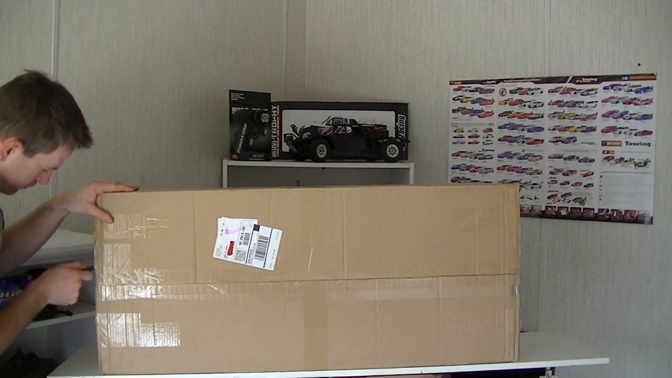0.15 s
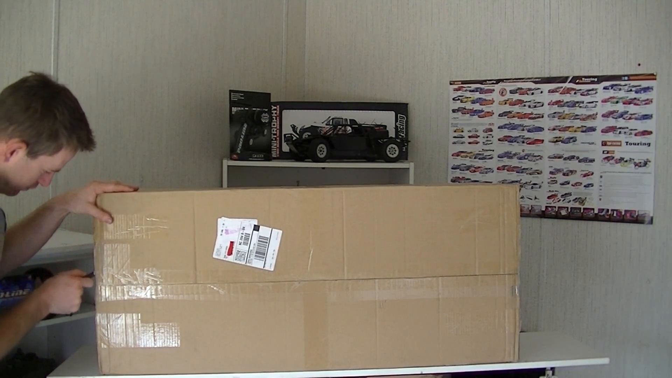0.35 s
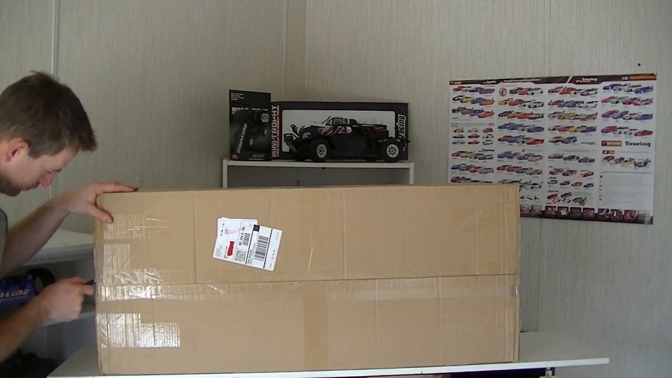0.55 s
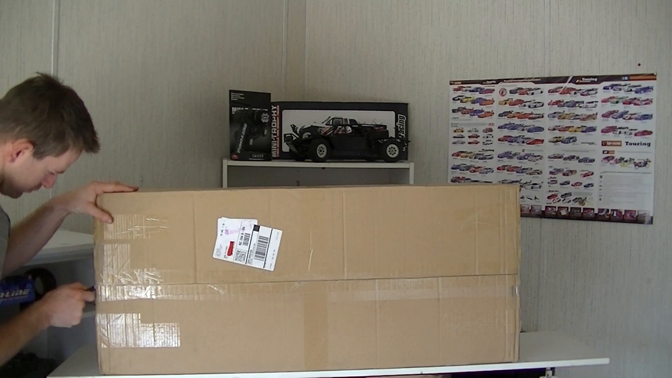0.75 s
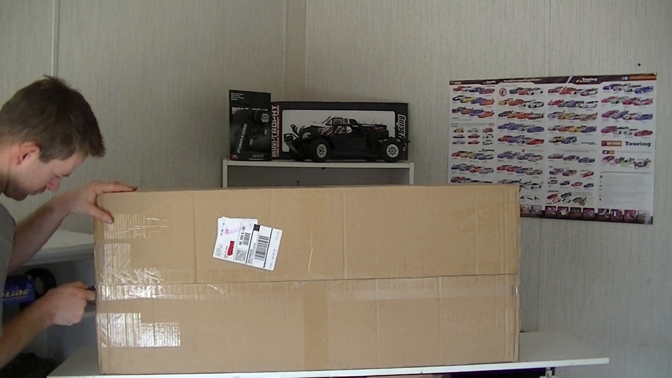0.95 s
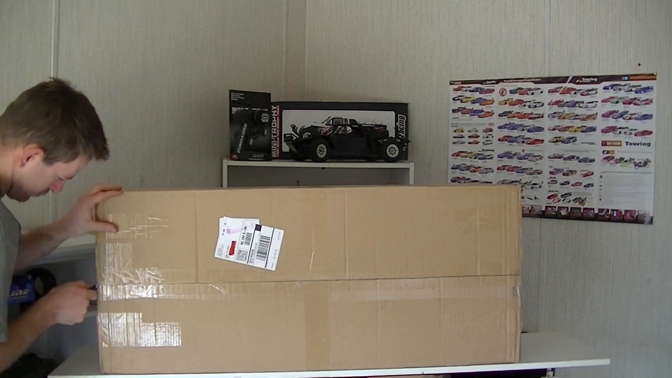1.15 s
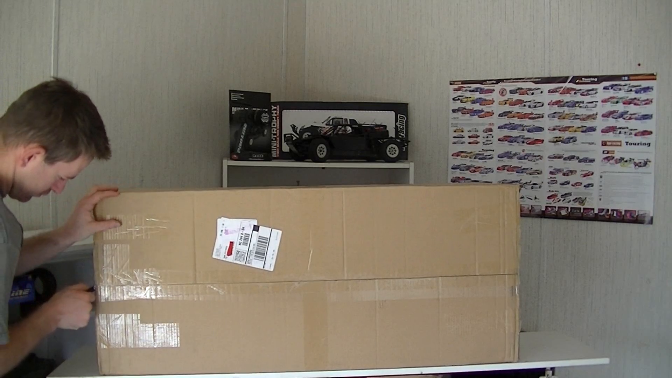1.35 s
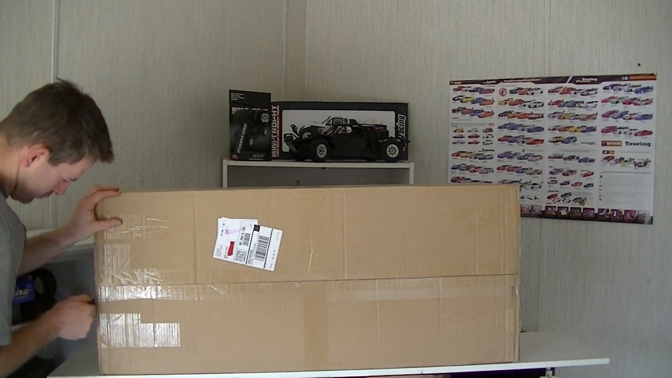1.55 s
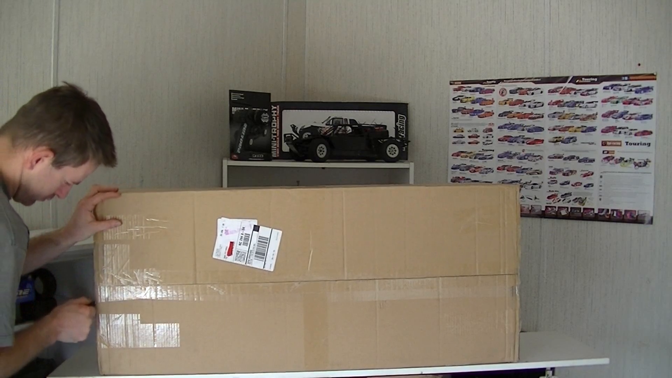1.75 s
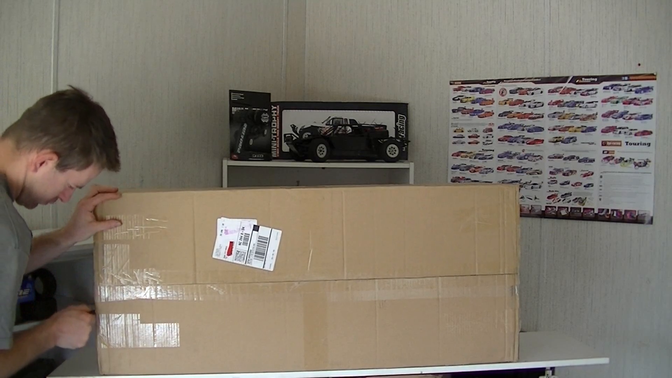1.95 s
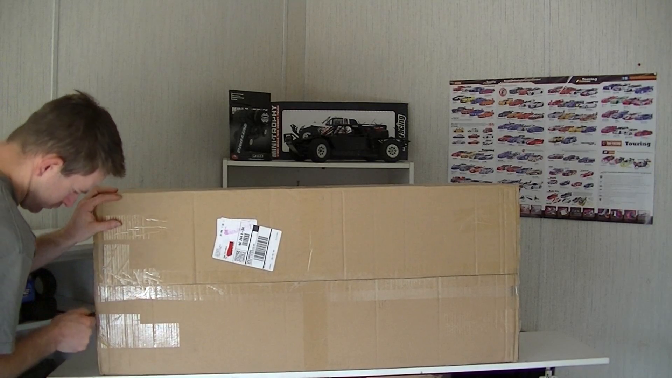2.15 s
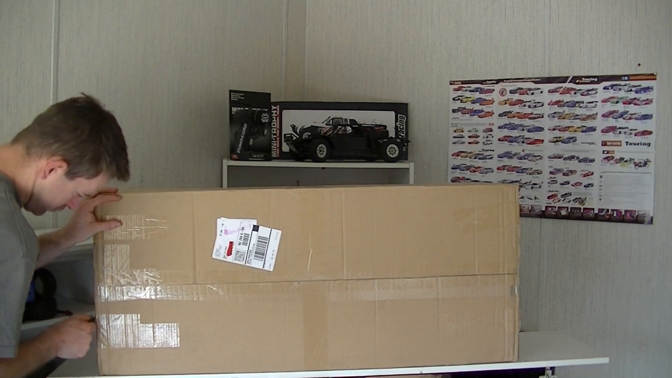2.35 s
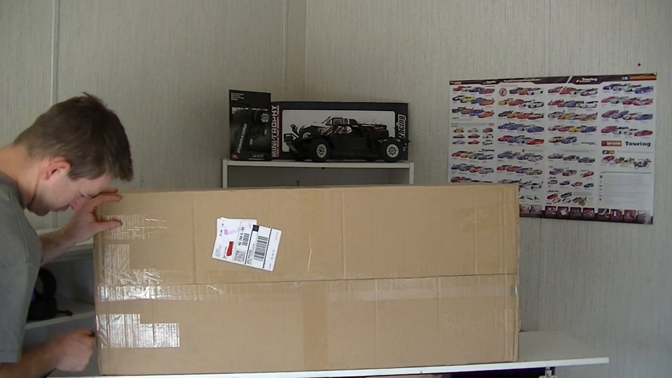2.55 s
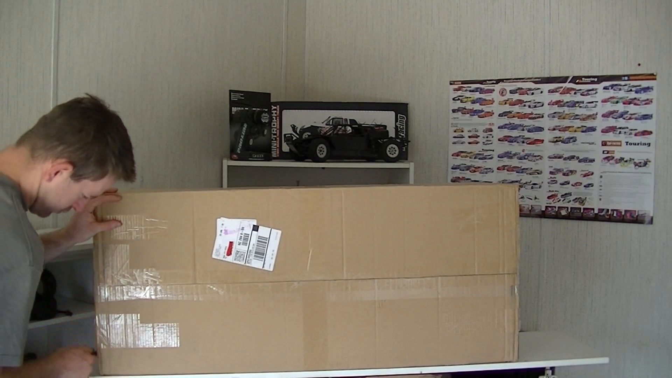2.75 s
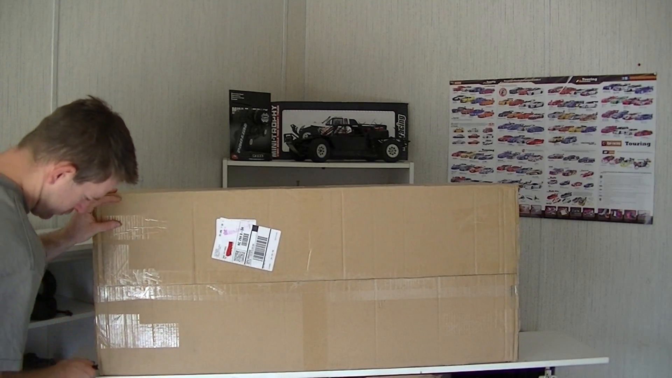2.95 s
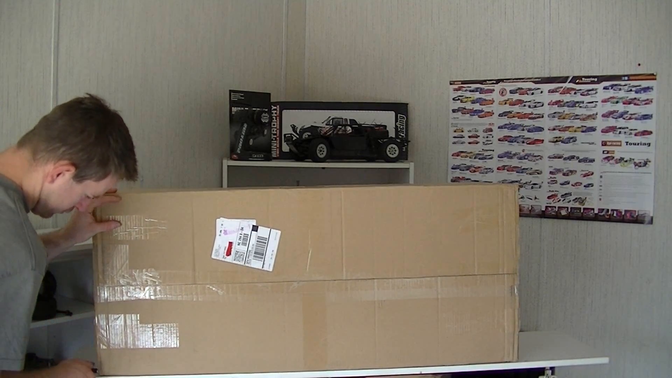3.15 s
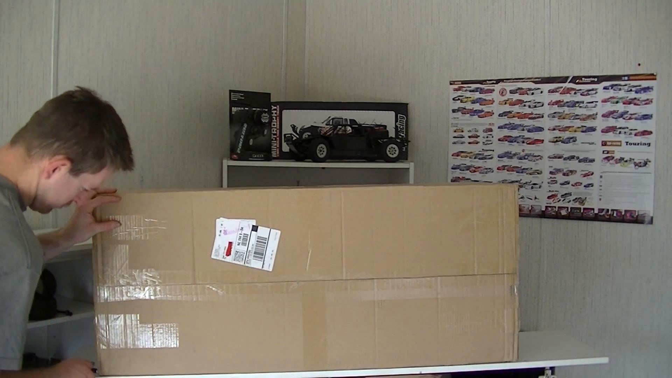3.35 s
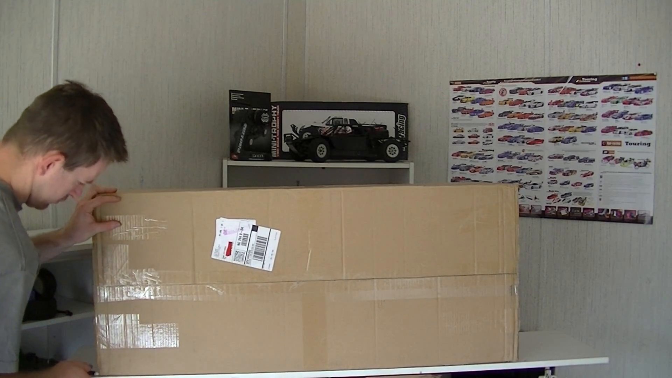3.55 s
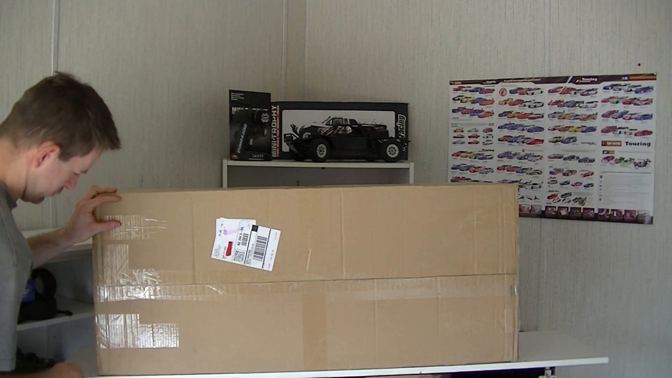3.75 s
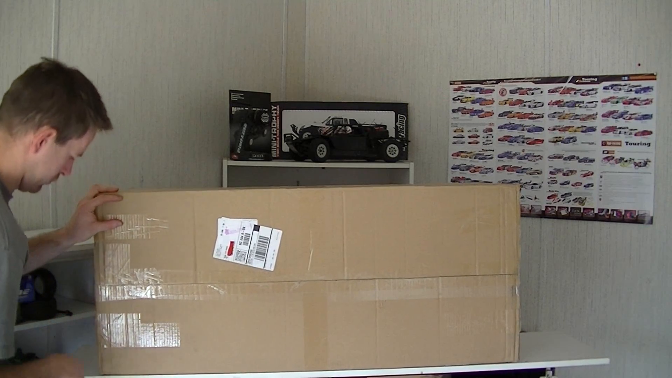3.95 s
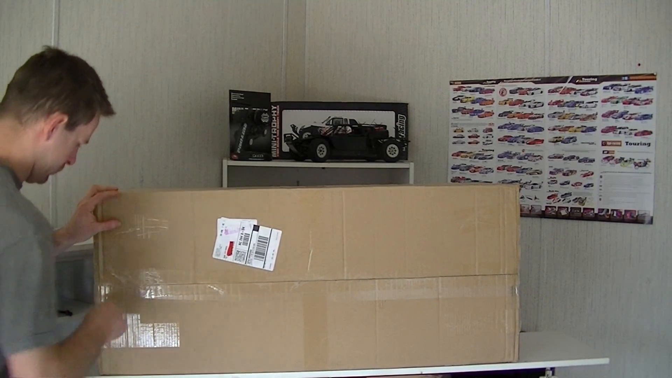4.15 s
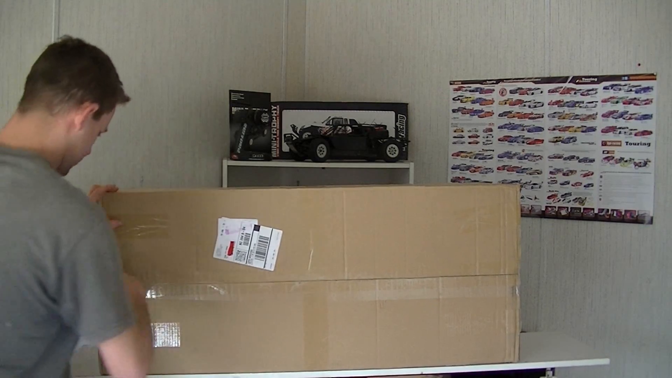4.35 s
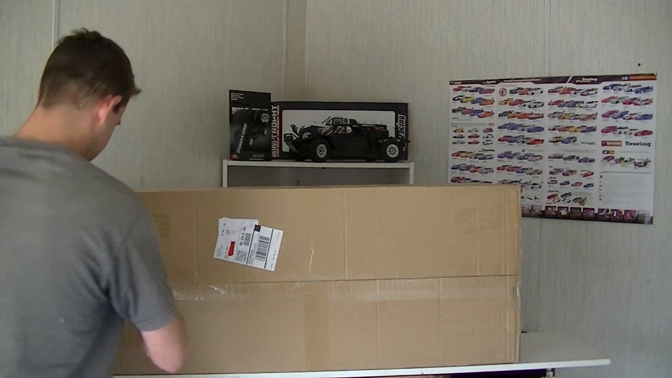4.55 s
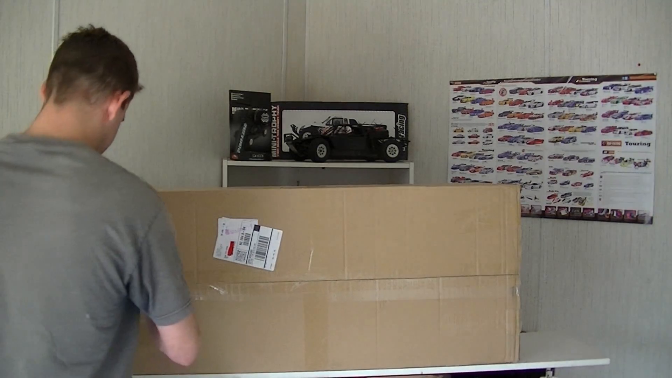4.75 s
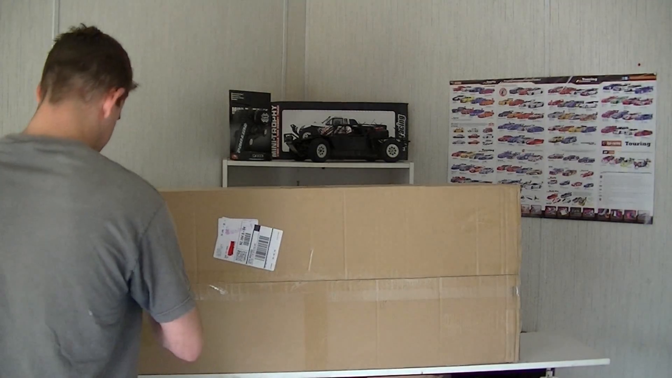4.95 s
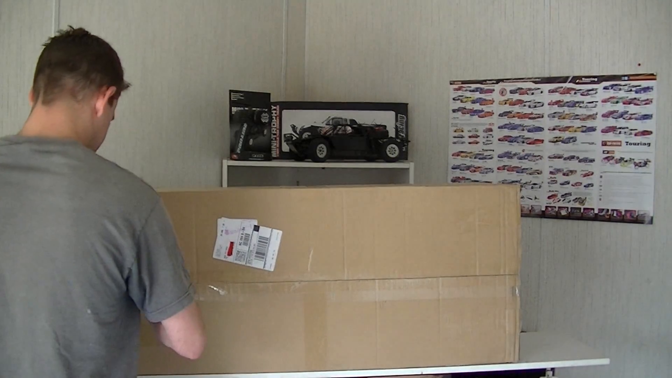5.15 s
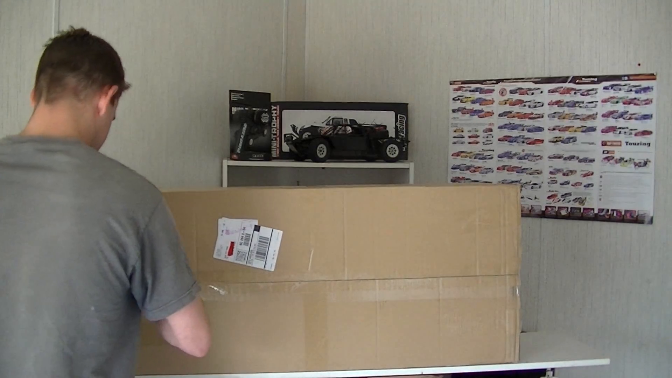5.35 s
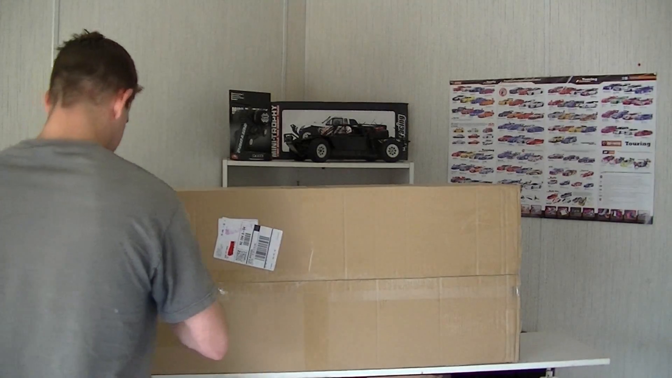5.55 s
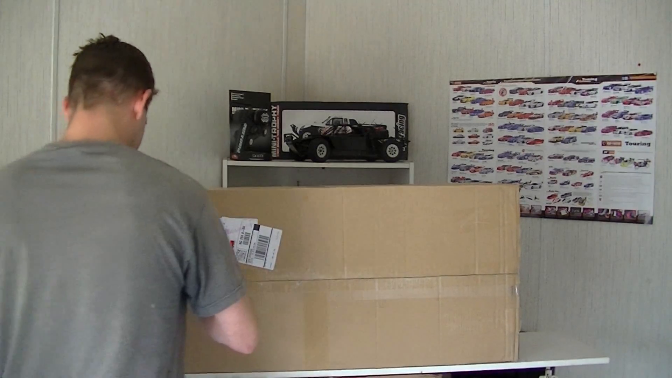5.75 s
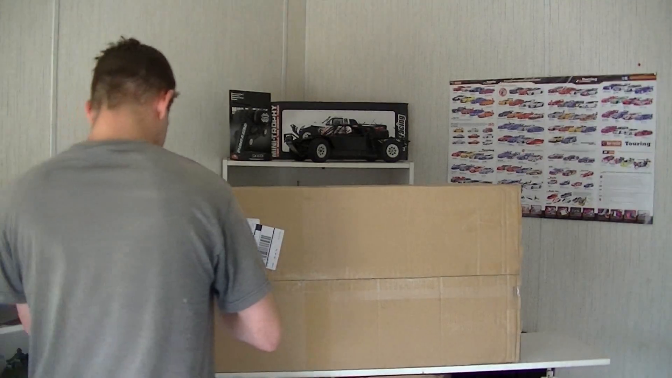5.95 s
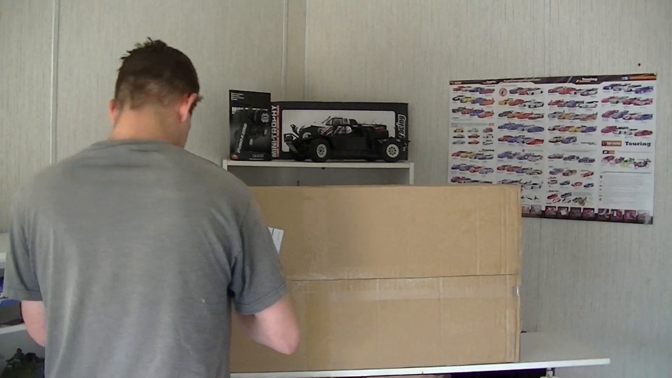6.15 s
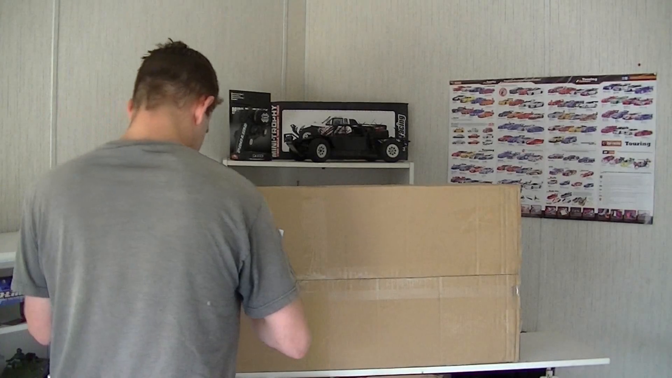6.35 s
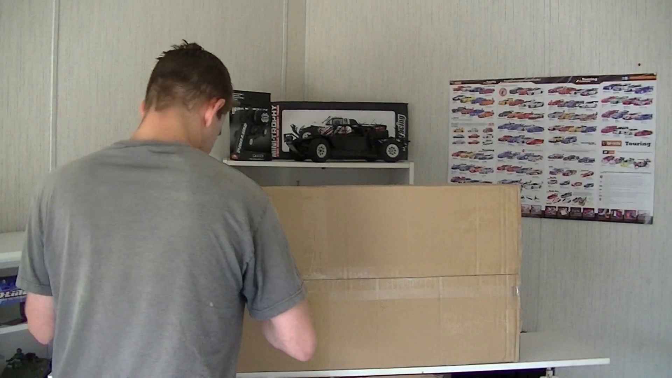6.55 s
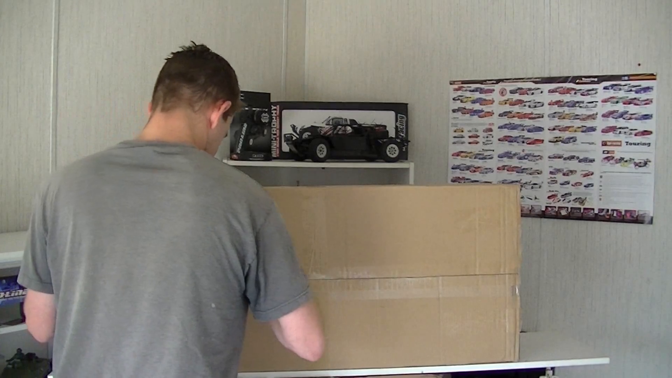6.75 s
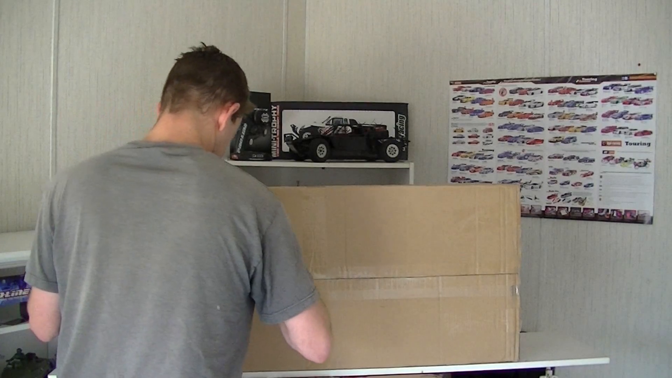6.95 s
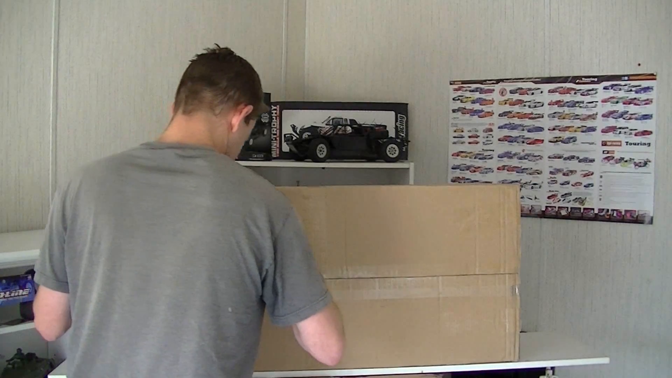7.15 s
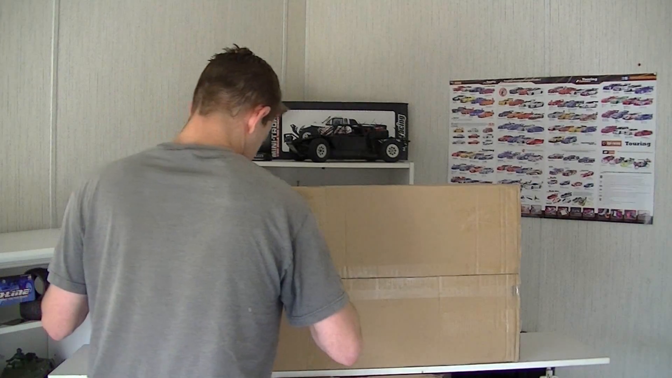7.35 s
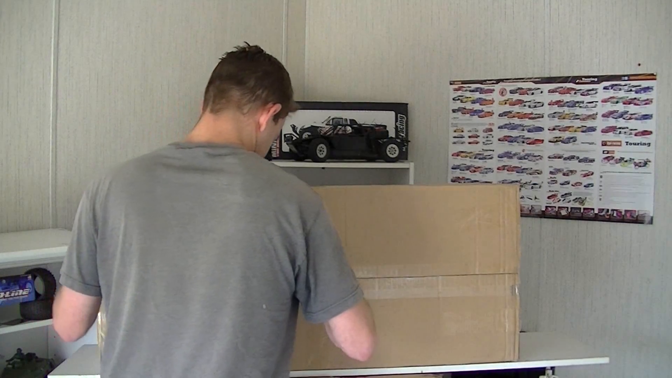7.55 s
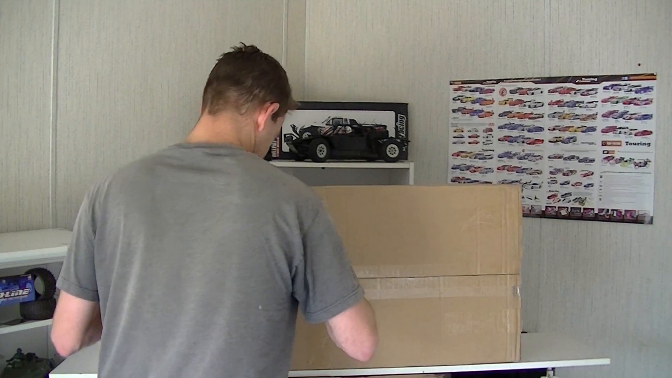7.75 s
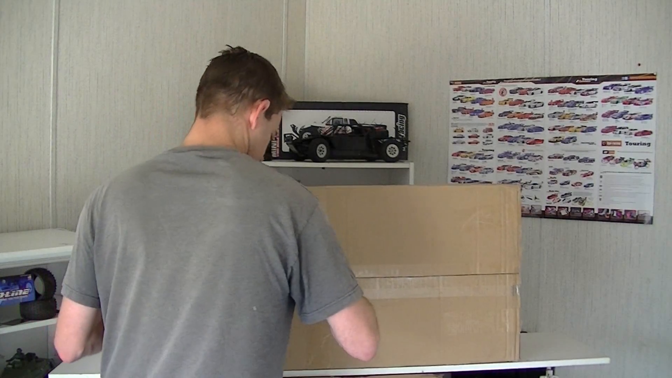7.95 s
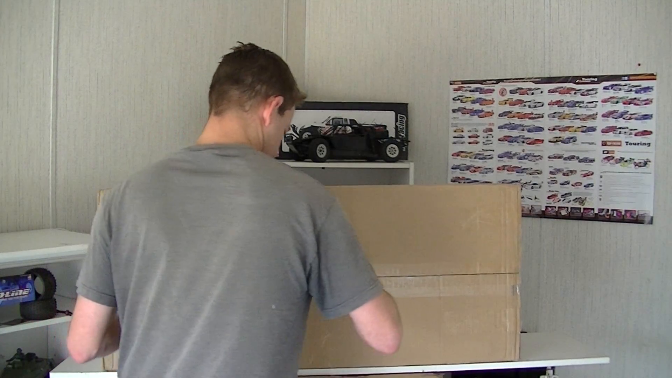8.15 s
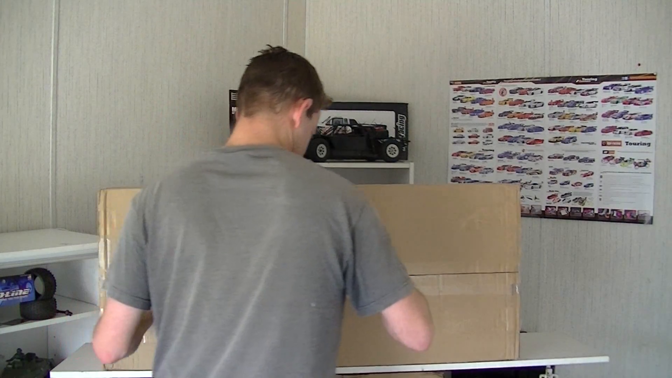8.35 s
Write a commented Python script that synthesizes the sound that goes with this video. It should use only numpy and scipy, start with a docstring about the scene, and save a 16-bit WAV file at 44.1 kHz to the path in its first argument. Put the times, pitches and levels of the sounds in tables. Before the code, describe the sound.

In a small room, a blade scratches through tape and cardboard in short uneven strokes. Light rasps and small ticks come first, then a sharp snap and a hollow knock. After a quiet lull, a loud crack starts heavier, nearly continuous sawing with knocks and brief panel booms. The microphone is a little distant, nearly mono, thin in the bass, with steady soft hiss.

```python
"""In a small room a blade is sawn through the tape and cardboard of a large box.
Tearing fibres, random clicks of uneven strength, scrape in a band that moves with the stroke and
rub the board; finer ones fizz above, coarser jolts drum the hollow box. Snaps of tape and knocks
are noise bursts that ring the modes of the box; one squeak, panel booms and low thuds join them.
Sparse echoes carry all but the thuds through the room, over the steady hiss of the camera."""
import sys
import numpy as np
from scipy import signal
from scipy.fft import rfft, irfft
from scipy.io import wavfile
from scipy.ndimage import uniform_filter1d

SR = 44100
rng = np.random.default_rng(int(sys.argv[2]) if len(sys.argv) > 2 else 0)


def int16_out(signal):
    """Quantize to a 16-bit WAV file."""
    q = np.round(np.clip(np.atleast_2d(signal).T, -1, 1) * 32767)
    wavfile.write(sys.argv[1], SR, q.astype(np.int16))


N = 373968  # length in samples


def gain_of(db):
    """Decibels to an amplitude factor."""
    return 10 ** (np.asarray(db) / 20)


def evened(x):
    """Scales to rms 1."""
    return x / np.sqrt(np.mean(x ** 2) + 1e-20)


def read(points, hz):
    """Reads a table on a log-frequency axis."""
    f, value = np.transpose(points)
    return np.interp(np.log(hz + 1), np.log(f + 1), value)


def add(mix, s, sound):
    """Mixes a sound in at time s."""
    part = mix[round(s * SR):][:len(sound)]
    part += sound[:len(part)]


def coloured(x, points):
    """Causal filter with the given spectrum, unit energy: the phase follows from the log gain."""
    hz = abs(np.fft.fftfreq(8192, 1 / SR))
    log_gain = np.log(gain_of(np.maximum(read(points, hz), -100)))
    taps = np.fft.ifft(np.exp(np.conj(signal.hilbert(log_gain)))).real[:4096]
    return signal.oaconvolve(x, taps / np.linalg.norm(taps))[:len(x)]


# Pushes of the blade and rubs of a hand. Each row: start, rise, hold and fall in seconds,
# scrape level in dB before the mix, centre of the scrape in Hz,
# then hollow drumming, rubbed board and fizz in dB relative to the scrape.
STROKES = [ (0, 0.00079, 0.056, 0.21, -38, 2020, -14.5, -10.5, -2.5),
           (.215, 0.019, .26, .08, -44.5, 1700, -29, -6.5, -1),
           (.54, 0.045, 0.019, 0.25, -38, 2090, -31, -10, -1.5),
           (0.861, 0.089, 0.14, 0.24, -43.5, 1660, -19, -3.5, 3),
           (1.24, .04, 0.012, 0.13, -50.5, 1692, -14, -7.5, -2),
           (1.362, 0.049, 0.073, .11, -33.5, 2030, -40, -12, -0.5),
           (1.4, 0.062, 0.047, 0.12, -28.5, 2180, -30, -11, -8),
           (1.57, .02, 0.017, 0.12, -46.5, 1800, -13, -1, -7),
           (1.705, 0.035, 0.026, .11, -36, 2040, -34, -8.5, -12.5),
           (1.732, 0.066, 0.041, 0.11, -30.5, 2100, -44, -6.5, -5.5),
           (2.11, 0.062, 0.048, 0.14, -36.5, 1880, -19, -4.5, -5.5),
           (2.387, 0.035, 0.075, 0.12, -41.5, 1910, -34, -0.5, -2),
           (2.42, .11, 0.061, 0.35, -34.5, 2010, -26, -10, 0),
           (2.64, 0.092, 0.086, 0.22, -28, 2420, -46, -26, -6),
           (2.929, 0.065, 0.082, .11, -36.5, 2347, -24, -5, -10),
           (3.15, .015, .02, 0.13, -53, 1490, -11, 3, -1), (3.2, .04, .03, .08, -54, 1600, -12, -2, 4),
           (3.29, 0.024, .01, 0.11, -56, 1300, -1, 8, -19), (3.49, 0.032, .02, 0.13, -41, 1610, -9, 2.5, 2),
           (3.6, 0.088, .03, .05, -37.5, 2020, -17, -6, -8),
           (3.693, .002, 0.023, 0.12, -25.5, 1700, -13, -7.5, -18),
           (3.86, 0.065, .01, 0.098, -52, 1630, -12, -1, -6),
           (4.06, 0.054, .01, .11, -58.5, 1550, -11, 3, 2),
           (4.15, 0.054, .17, .05, -60, 1770, -4, -8, -1.5),
           (4.401, 0.025, 0.14, 0.17, -50.5, 1830, -7, -3.5, -1.5),
           (4.55, 0.048, 0.014, 0.57, -48, 2640, -25, -12, -3),
           (4.76, 0.089, .01, 0.045, -54, 1690, .1, .1, -1),
           (4.867, .002, 0.017, 0.086, -41, 2030, 3, 1.5, -15),
           (5.05, 0.058, .01, 0.22, -57, 1950, -19, -4, -1),
           (5.164, 0.0016, 0.032, 0.12, -24.5, 1510, -25, -6.5, -2),
           (5.25, .04, .19, 0.06, -49, 1570, -29, -5, -1.5),
           (5.477, .025, 0.024, 0.2, -34, 2030, -9, -3.5, -3.5),
           (5.55, .005, .02, 0.22, -32, 1720, -17, -8, -5),
           (5.621, 0.0015, 0.044, 0.21, -28.5, 1600, -6, -4, -3),
           (5.72, 0.0088, .03, .11, -33, 1550, -8, -4, -6),
           (5.764, .002, 0.068, .19, -27.5, 1640, -4.5, -1.5, -3),
           (5.94, 0.033, .08, .05, -40, 1600, -15, -6, -1.2),
           (6.047, 0.0013, 0.054, 0.2, -31, 1800, -1, -1.7, -3),
           (6.099, 0.056, 0.066, 0.56, -32, 1990, -11, -4.5, -3),
           (6.268, 0.037, 0.013, 0.47, -35, 1640, -8.5, -7.5, 2.5),
           (6.38, 0.048, 0.016, 0.057, -40.5, 1600, -15, -12, 2.5),
           (6.5, .07, 0.02, 0.018, -45, 1410, -54, -10, -3.3),
           (6.596, 0.0038, 0.054, 0.12, -22, 1420, -9.5, -4.5, -8.5),
           (6.68, 0.034, 0.076, 0.22, -38, 1500, -11, -4.5, -4.5),
           (6.85, 0.1, 0.092, 0.33, -33.5, 1550, -14, -6.5, -6),
           (7.029, 0.081, 0.023, 0.16, -35.5, 1830, -7.5, -6.5, -0.5),
           (7.206, 0.0048, 0.097, .05, -38, 1536, -17.5, -4.5, -2.5),
           (7.288, 0.044, 0.031, 0.37, -25.5, 1530, -15, -4.5, -9.5),
           (7.5, .05, 0.099, 0.093, -49, 1730, -11, -20, 5.5),
           (7.598, 0.12, 0.0071, 0.21, -36.5, 1740, -37, -10, 2.5),
           (7.78, 0.06, .04, .05, -43, 1570, -3.5, -4, 0),
           (7.86, 0.0069, .03, 0.4, -34, 1680, -14, -3, -0.5),
           (7.921, 0.087, 0.0081, 0.083, -29, 1610, -9, -5, -6),
           (8.03, 0.016, 0.04, 0.31, -33.5, 1550, -11, -6, -5),
           (8.11, 0.019, 0.081, 0.36, -32.5, 1540, -14, -2, -5),
           (8.2, 0.062, .19, 0.24, -30.5, 1550, -10, -5, -6)]
# Stretch of the fall time. In order: scrape, hollow, board, fizz, as factors.
FALL_STRETCH = np.array([0.97, 0.89, 1.15, 0.8])
# Shift of the moment each layer starts to fall, board and fizz early, hollow last.
# In order: scrape, hollow, board, fizz, in seconds.
FALL_LAG_S = np.array([-0.002, 0.01, -0.0049, -0.0046])
BITE_DB, FALL_DB = -20.5, -31.5  # level at first touch, and after the fall time, relative to the hold
SAG_OCTAVES_PER_DB = 0.03  # the scrape sinks in pitch as the blade slows


def effort():
    """Every stroke bites, swells, holds and falls away; gives four layer gains and the scrape pitch."""
    power = np.full((4, N), 1e-12)
    pitch = np.full(N, 1e-12 * 1700)  # rests at 1700 Hz; the louder stroke pulls the pitch its way
    for start, rise, hold, fall, db, hz, *others_db in STROKES:
        at, rise, fall = round(start * SR), max(rise, .001), max(fall, .02)
        t = np.arange(min(N - at, round((rise + hold + 3 * fall) * SR))) / SR
        bite_db = BITE_DB * np.maximum(1 - t / rise, 0) ** 2
        falling_s = np.maximum(t - rise - hold - FALL_LAG_S[:, None], 0)
        shape_db = bite_db + FALL_DB * falling_s / (fall * FALL_STRETCH[:, None])
        level_db = db + np.array([0, *others_db])[:, None]
        layers = gain_of(level_db + shape_db) ** 2
        power[:, at:at + len(t)] += layers
        pitch[at:at + len(t)] += layers[0] * hz * 2 ** (SAG_OCTAVES_PER_DB * shape_db[0])
    return np.sqrt(power), pitch / power[0]


def fibres(per_s, spread_db, grip_db):
    """Fibres break at random with uneven strength; the blade grips and slips, so loudness clumps."""
    size = gain_of(spread_db * np.minimum(rng.exponential(1, N), 5)) * rng.choice([-1., 1.], N)
    # noise smoothed at 40 Hz is the grip
    grip = evened(signal.lfilter([1], [1, -np.exp(-2 * np.pi * 40 / SR)], rng.standard_normal(N)))
    breaks = rng.random(N) < per_s / SR
    return evened(size * breaks * gain_of(grip_db * grip))


def resonate(x, hz, width_hz):
    """A moving resonance: shifts the curve hz down to zero, smooths, and shifts back."""
    turn = np.exp(2j * np.pi * np.cumsum(hz) / SR)
    r = np.exp(-np.pi * width_hz / SR)
    return 2 * (turn * signal.lfilter([1 - r], [1, -r], x / turn)).real


# Spectrum of the fizz and of the treble ticks. Each row: frequency in Hz, density in dB per Hz.
FIZZ = [(1760, -17.5), (3000, 0.5), (3260, 1.5), (3570, -2), (4730, -4), (8760, -1.5), (12500, -10.5),
        (15100, -24.5), (16000, -60)]
# Spectrum of a crack of tape. Each row: frequency in Hz, density in dB per Hz.
CRACK = [(290, -52), (500, -11), (719, -32), (868, -67), (1020, 0), (1360, 1), (1520, -7.5), (1650, -1.5),
         (6000, -10.5), (7800, -112), (13200, -120)]
# Spectrum of the rubbed board. Each row: frequency in Hz, density in dB per Hz.
BOARD = [(240, -23), (400, -6.5), (570, 4), (663, 1), (757, 12.5), (928, 17.5), (1600, -4.5), (2080, -34),
         (3520, -120)]
# Spectrum of the air inside the box. Each row: frequency in Hz, density in dB per Hz.
HOLLOW = [(24, -79), (40, -55), (156, -30), (178, -4.5), (273, 1), (311, -9.5), (520, 3), (680, -19),
          (1140, -120)]


def strokes():
    """One tearing scrapes in a moving band and rubs the board; a finer one fizzes; jolts drum the box."""
    gains, hz = effort()
    tear = fibres(per_s=6000, spread_db=1.0, grip_db=1.5)
    scrape = evened(resonate(resonate(tear, hz, width_hz=1040), hz, width_hz=4300))
    fine_tear = fibres(per_s=7000, spread_db=-2.0, grip_db=0.5)
    fizz = evened(coloured(tear + 14.0 * fine_tear, FIZZ))
    board_ring = evened(drummed(tear, panel_hz=644, reach_octaves=1.0))
    board = evened(coloured(tear, BOARD)) + 0.043 * board_ring
    push = fibres(per_s=750, spread_db=1.0, grip_db=-1.5)  # the hand shakes the whole box in coarser jolts
    box_ring = evened(drummed(push, panel_hz=302, reach_octaves=0.88))
    hollow = evened(coloured(push, HOLLOW)) + 0.72 * box_ring
    # now and then a strand of tape pops
    burst = rng.standard_normal(400) * np.exp(-np.arange(400) / SR / 0.0053)
    pops = evened(signal.oaconvolve(fibres(per_s=30, spread_db=2.0, grip_db=-2.0), burst)[:N])
    fizz = fizz + gain_of(-8) * evened(coloured(pops, FIZZ))
    scrape = scrape + gain_of(-15) * evened(coloured(pops, CRACK))
    return (gains * [scrape, evened(hollow), evened(board), fizz]).sum(0)


# Modes of the cardboard panels. Each row: frequency in Hz, strength in dB relative to one another.
BOX = [(240, 6), (284, -1), (308, -3), (340, -13), (378, 3), (425, 3), (490, 6.5), (545, 4), (592, 9.5),
       (660, -3.5), (747, 9), (860, -17), (1005, 7)]


def drummed(x, panel_hz, reach_octaves):
    """Sends a force into the box; the modes near the pitch of the panel struck ring most."""
    t, ring = np.arange(SR // 4) / SR, 0
    for hz, db in BOX:
        t60 = .28 * (300 / hz) ** 1.9  # cardboard damps the higher modes sooner
        near_db = -6 * (np.log2(hz / panel_hz) / reach_octaves) ** 2
        ring = ring + gain_of(db + near_db - 60 * t / t60) * np.sin(2 * np.pi * hz * t)
    return signal.oaconvolve(x, ring / np.linalg.norm(ring))[:len(x)]


# Snaps of tape and knocks on the box. Each row: start in seconds, crack and box ring in dB
# before the mix, pitch of the panel struck in Hz, treble tick in dB before the mix.
SNAPS = [(.2329, -33, -48, 730, -59), (0.328, -28, -40, 760, -33.5), (0.5084, -30.5, -48, 786, -37.5),
         (0.5602, -32, -52, 934, -35), (0.733, -36.5, -62, 904, -39.5), (.886, -30, -40.5, 483, -57),
         (1.373, -34, -52, 800, -51), (1.3967, -23.5, -55, 848, -32), (1.593, -29, -39.5, 556, -53),
         (1.715, -38, -47, 700, -67), (2.078, -37, -62, 538, -63), (2.156, -24.5, -59, 826, -38),
         (2.3585, -33, -59, 382, -48), (2.389, -28, -58, 950, -41.5), (3.043, -16.5, -36, 840, -41),
         (3.1632, -30, -39.5, 1010, -44), (3.3136, -32, -35, 960, -60), (3.5158, -10.5, -19.5, 770, -27.5),
         (3.6946, -22, -26, 775, -36), (4.099, -56, -45, 510, -49), (4.4046, -44, -53, 802, -46),
         (4.5075, -29, -39, 520, -38), (4.8235, -42, -39.5, 453, -52), (4.8691, -27.5, -22.5, 410, -36),
         (5.1621, -4.5, -17, 990, -16), (5.3424, -49, -47, 780, -43), (5.4946, -15, -25, 550, -37),
         (5.5522, -24, -27.5, 770, -32), (5.6213, -14.5, -24.5, 540, -24.5), (5.6528, -32, -22, 740, -49),
         (5.7224, -17.5, -35, 544, -42), (5.7639, -12, -21, 1010, -46), (5.9505, -48, -43, 1000, -35),
         (6.0465, -16, -18, 900, -32.5), (6.3186, -22, -33, 870, -30.5), (6.604, -14, -18.5, 474, -46),
         (6.8665, -27, -43, 999, -39.5), (7.206, -33, -35.5, 557, -32), (7.2896, -15.5, -23.5, 580, -34),
         (7.8683, -16.5, -34, 840, -30), (7.9612, -16, -49, 900, -33.5)]
CRACK_S, TICK_S = 0.0027, .0016  # decay to 1/e


def snaps():
    """Each blow is a dying noise burst and a treble tick, both opened by a click, and a push on the box."""
    crack, ring, tick = np.zeros((3, N))
    t = np.arange(SR // 4) / SR
    bursts = rng.standard_normal((len(SNAPS), 2, len(t)))
    push = np.exp(-t / .0001)
    click = t == 0
    for (s, crack_db, ring_db, panel_hz, tick_db), burst in zip(SNAPS, bursts):
        add(crack, s, gain_of(crack_db) * (4.2 * click + burst[0] * np.exp(-t / CRACK_S)))
        add(tick, s, gain_of(tick_db) * (3.1 * click + burst[1] * np.exp(-t / TICK_S)))
        add(ring, s, gain_of(ring_db) * drummed(push, panel_hz, reach_octaves=0.27))
    return coloured(crack, CRACK), coloured(tick, FIZZ), ring


# The blade squeaks once on the tape. One row: peak level in dB before the mix, pitch in Hz,
# time from the peak down to 1/e in ms.
SQUEAK = (-32, 2000, 14)
SQUEAK_S = 7.71  # moment of the peak


def squeak():
    """A brief whistle of the rubbing blade: a sine with a wavering pitch under a bell-shaped swell."""
    db, hz, ms = SQUEAK
    t = np.arange(N) / SR
    waver = evened(uniform_filter1d(rng.standard_normal(N), size=300))
    whistle = np.sin(2 * np.pi * np.cumsum(hz + 40 * waver) / SR)
    return gain_of(db) * whistle * np.exp(-((t - SQUEAK_S) * 1000 / ms) ** 2)


# A wide panel flexes and sings on nearly one mode. Each row: start in seconds,
# level in dB before the mix, pitch in Hz, swell in seconds.
BOOMS = [(3.7138, -17.5, 313, 0.0038), (4.871, -22, 380, .008), (5.202, -24.5, 284, 0.018),
         (5.785, -16, 284, .015)]
BOOM_DAMP_DB_PER_S = -40  # a hand damps the singing panel, on top of its own decay


def booms():
    """A panel swells into its note and is damped again."""
    out, t = np.zeros(N), np.arange(SR // 4) / SR
    for s, db, panel_hz, swell in BOOMS:
        rise = 1 - np.exp(-(t / swell) ** 2)
        fade = np.cos(2 * np.pi * t) ** .5  # reaches silence after a quarter second
        shape = rise * gain_of(db + BOOM_DAMP_DB_PER_S * t) * fade
        add(out, s, shape * drummed(1. * (t == 0), panel_hz, reach_octaves=.045))
    return out


# Low thuds under some of the hard blows. Each row: start in seconds,
# level in dB before the bass is thinned.
THUDS = [(4.869, -29), (5.622, -36), (6.6, -28), (1.43, -42), (5.163, -26.5)]
THUD_HZ, THUD_S = 80, .012  # pitch, decay to 1/e


def thuds():
    """A short low thud: a dying sine."""
    out, t = np.zeros(N), np.arange(SR // 5) / SR
    for s, db in THUDS:
        add(out, s, gain_of(db) * np.sin(2 * np.pi * THUD_HZ * t) * np.exp(-t / THUD_S))
    return out


# Decay of the room. Each row: frequency in Hz, time to fall by 60 dB in seconds.
ROOM = [(200, 0.35), (530, 0.38), (1390, 0.22), (3680, 0.35), (9700, 0.2)]


def room(x):
    """Sparse echoes of random sign, one in every 20 samples, each band dying at its own speed; two tails."""
    taps = np.zeros((2, SR // 2))
    at = np.arange(80, SR // 2 - 20, 20)
    at = at + rng.integers(0, 20, (2, len(at)))
    np.put_along_axis(taps, at, rng.choice([-1., 1.], at.shape), 1)
    taps[1] *= 1 - np.exp(-np.arange(SR // 2) / SR / 0.0018)  # echoes from the sides build up later
    hz, t, z = signal.stft(taps, SR, nperseg=256)
    tail = signal.istft(z * gain_of(-60 * t / read(ROOM, hz)[:, None]), SR, nperseg=256)[1]
    tail = tail / np.linalg.norm(tail, axis=1)[:, None]
    return signal.oaconvolve(x[None], tail, axes=1)[:, :N]


# Spectrum of the hiss. Each row: frequency in Hz, density in dB per Hz.
HISS = [(18, -52), (30, 8), (287, -7), (426, -5), (666, -1.5), (1430, -2.5), (2750, -4.5), (2980, -5.5),
        (3870, -6), (6550, -9.5), (7090, -9.5), (9460, -8), (16000, -18.5)]
HISS_DB = -55  # rms before the stereo and microphone filters


def hiss():
    """Steady noise of the camera and the quiet room, two unrelated draws."""
    return gain_of(HISS_DB) * np.array([coloured(v, HISS) for v in rng.standard_normal((2, N))])


# First echoes of cracks and ticks off table and wall. Each row: delay in ms, level in dB re direct.
BOUNCES = [(2.6, -6), (4.4, -4)]
# Stereo spread of the echoes. Each row: frequency in Hz, side level in dB re the middle.
ECHO_SPREAD = [(60, -20), (250, -25), (1000, -14), (3000, -14.5), (5500, -8), (8000, -10.5), (10500, -21.5),
               (13000, -48)]
# Stereo spread of the hiss. Each row: frequency in Hz, side level in dB re the middle.
HISS_SPREAD = [(60, -3), (200, -2.5), (500, -3.5), (3000, -7), (6000, -8), (9000, -18), (13000, -33)]


def scene():
    """Nearly mono: a strong middle and a weak side of echoes and hiss, narrow in the treble."""
    cut = strokes() + squeak()
    crack, tick, ring = snaps()
    boom = booms()
    # what each source sends into the room
    sent = gain_of(5) * boom + gain_of(-10.5) * cut
    sent = sent + gain_of(-7.5) * crack + gain_of(1.5) * tick + gain_of(5.0) * ring
    echoes, noise = room(sent), hiss()
    # what arrives directly; the booms come mostly this way
    sharp = gain_of(-11.5) * crack + gain_of(2.5) * tick
    bounced = sum(gain_of(db) * np.roll(sharp, round(ms * SR / 1000)) for ms, db in BOUNCES)
    direct = thuds() + gain_of(17) * boom + gain_of(-2.5) * cut + sharp + gain_of(3.0) * ring
    mid = direct + bounced + echoes[0] + noise[0]
    hz = np.fft.rfftfreq(N, 1 / SR)
    side_echoes = rfft(echoes[1]) * gain_of(read(ECHO_SPREAD, hz))
    side_noise = rfft(noise[1]) * gain_of(read(HISS_SPREAD, hz))
    side = irfft(side_echoes + side_noise, N)
    return np.array([mid + side, mid - side])


# Microphones thin in the bass. Each row: frequency in Hz, response in dB before scaling to unit energy.
MICROPHONE = [(30, -33), (70, -30), (110, -22.5), (160, -13.5), (220, -10.5), (300, -0.5)]
EDGE_HZ = 15850  # upper band limit of the camera


def record(dry):
    """The microphones lose the bass; then a steep low-pass sets the band limit of the camera."""
    thin = np.array([coloured(v, MICROPHONE) for v in dry])
    low_pass = signal.firwin(511, EDGE_HZ, window=("kaiser", 9), fs=SR)
    return signal.oaconvolve(thin, low_pass[None], "same")


dry = scene()
out = record(dry)
int16_out(out)
```